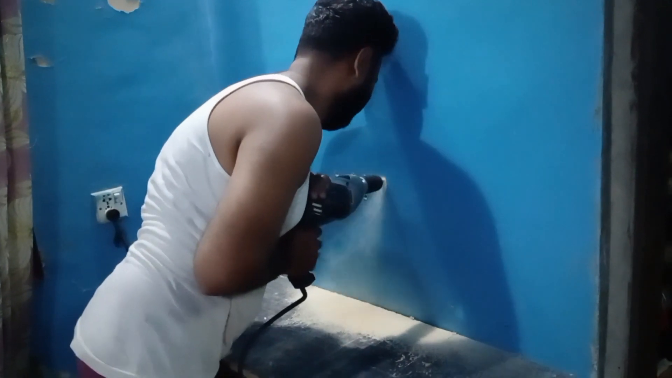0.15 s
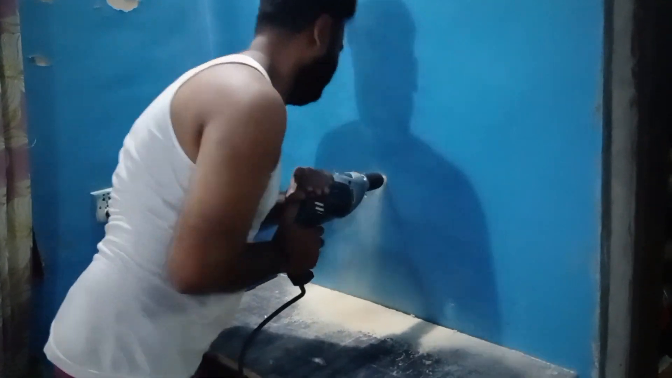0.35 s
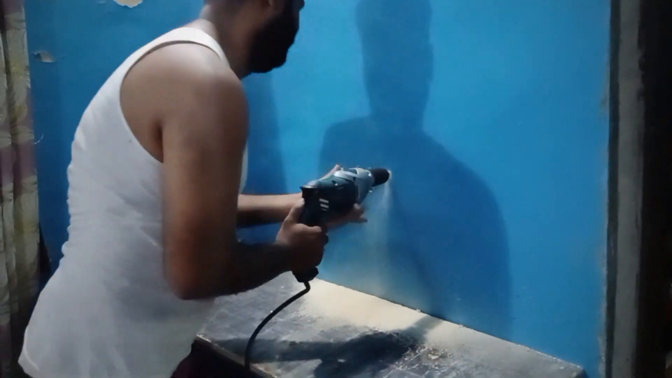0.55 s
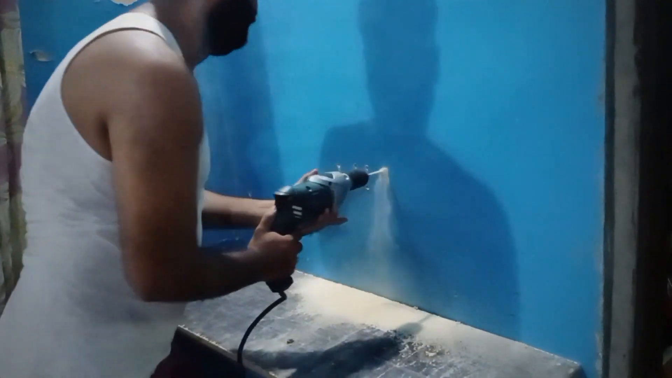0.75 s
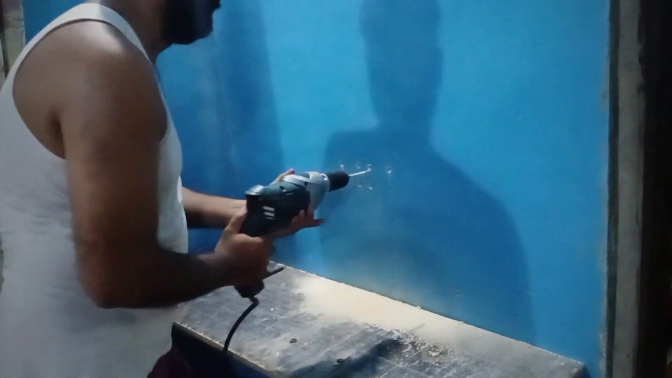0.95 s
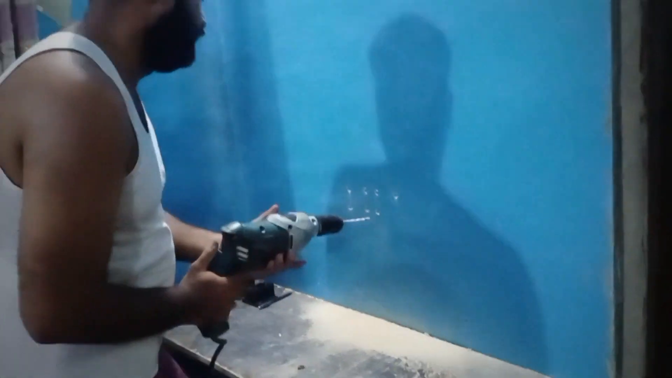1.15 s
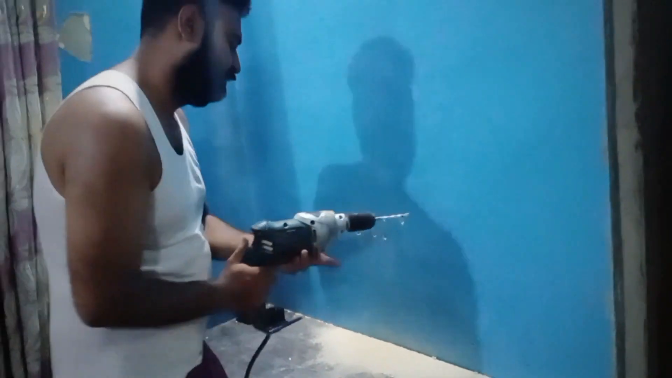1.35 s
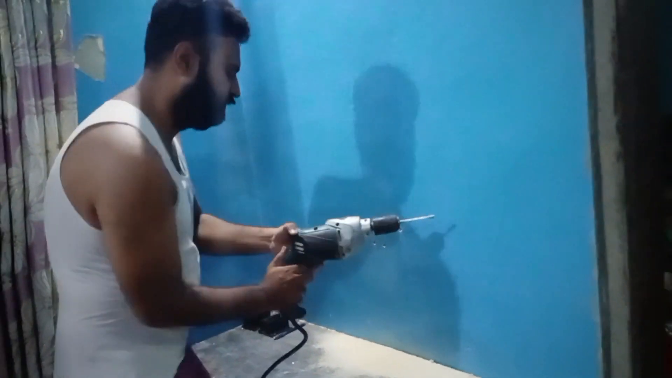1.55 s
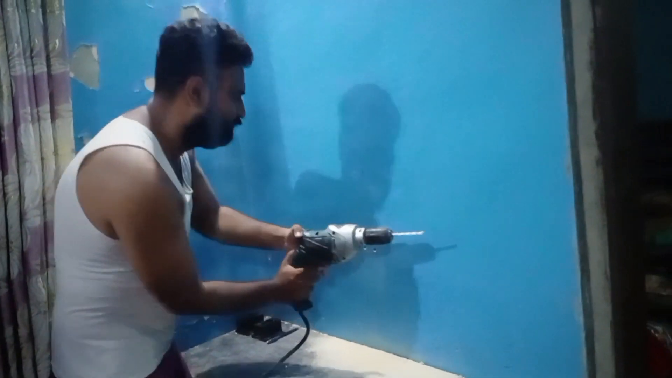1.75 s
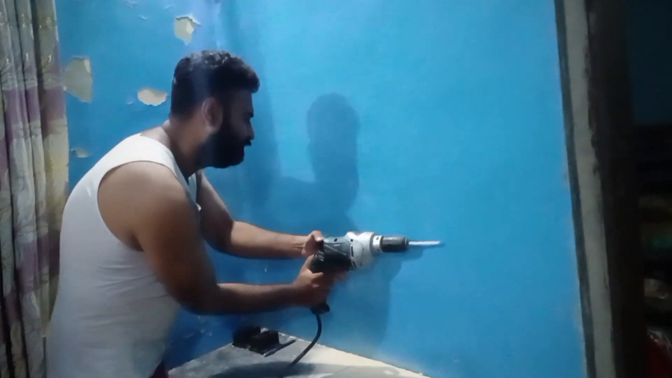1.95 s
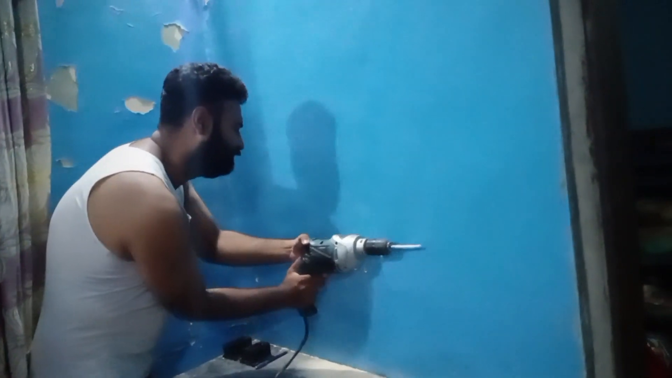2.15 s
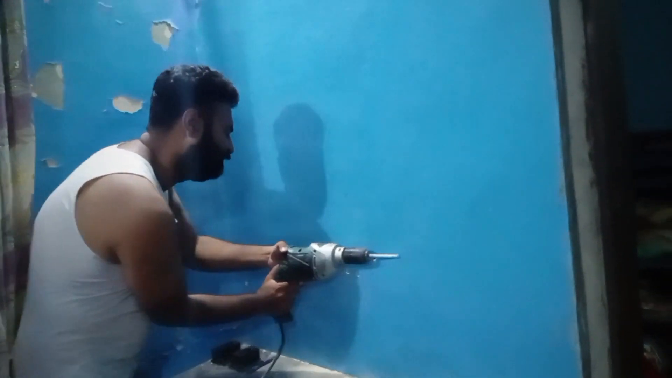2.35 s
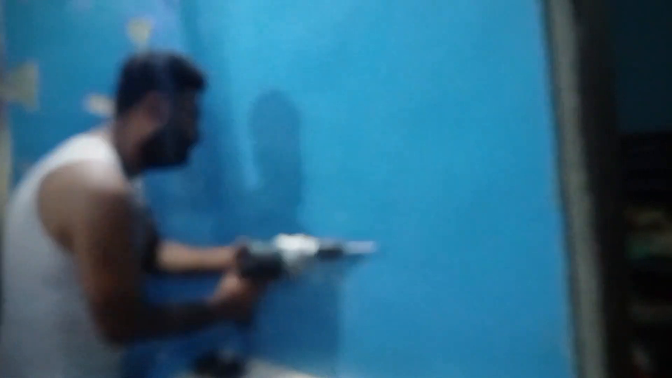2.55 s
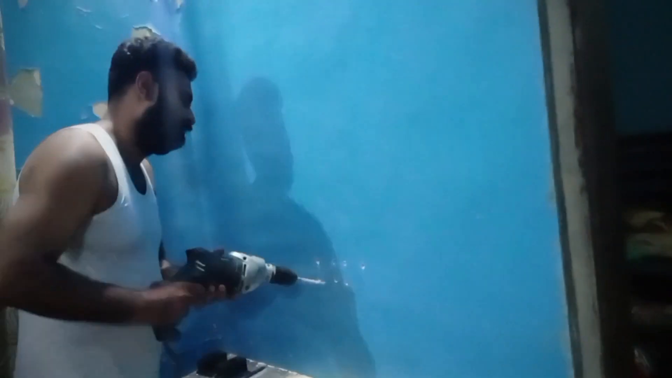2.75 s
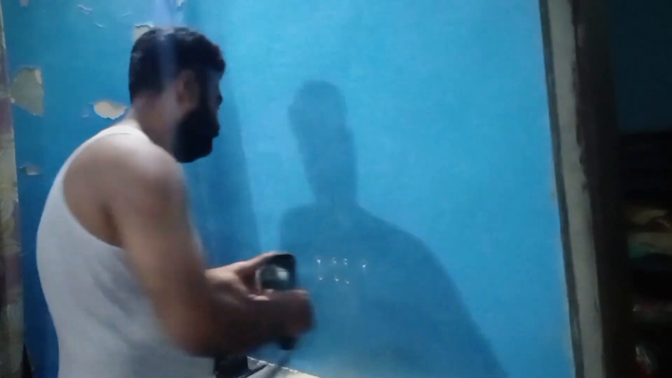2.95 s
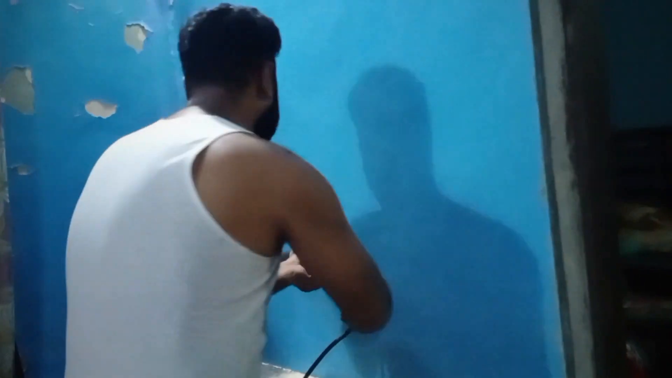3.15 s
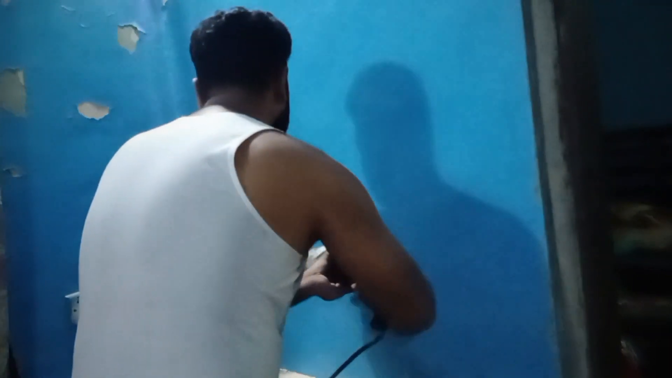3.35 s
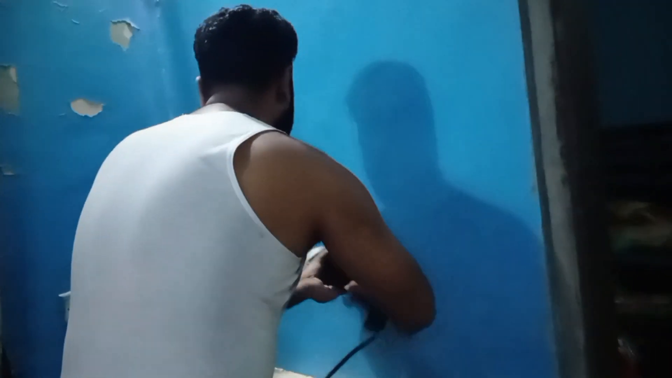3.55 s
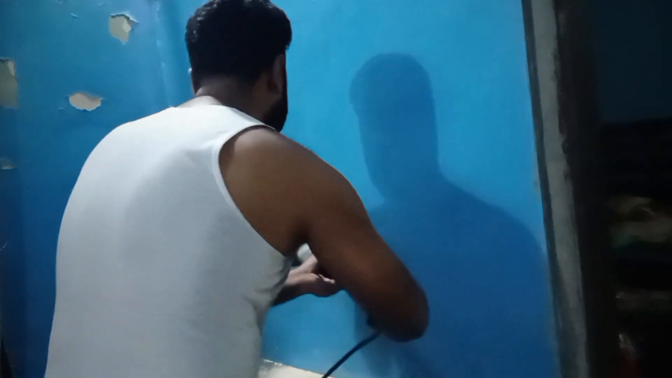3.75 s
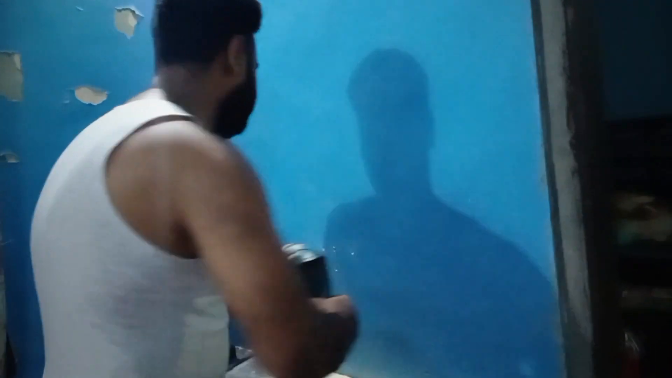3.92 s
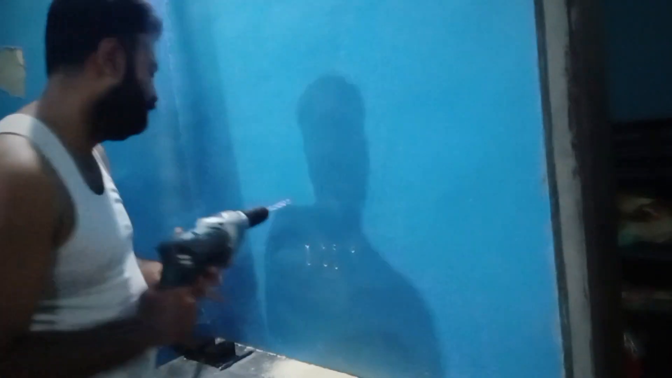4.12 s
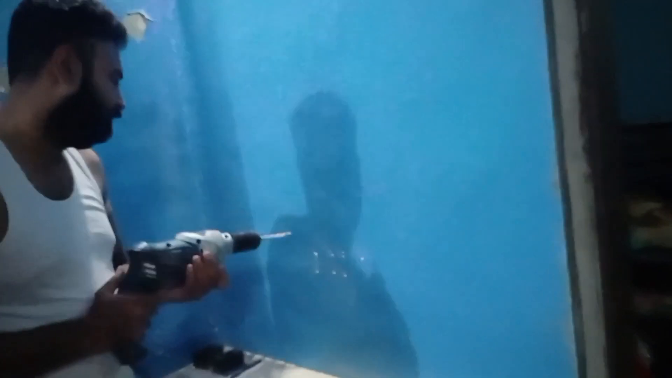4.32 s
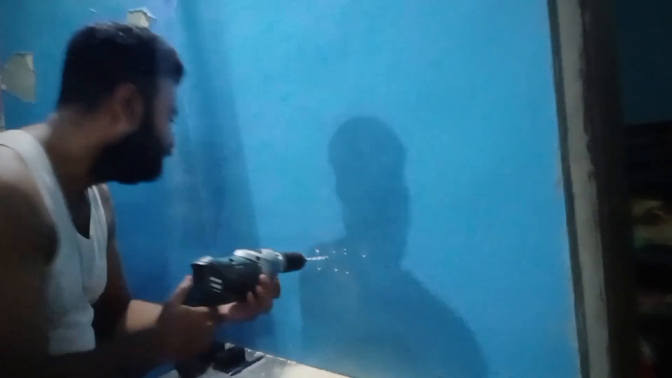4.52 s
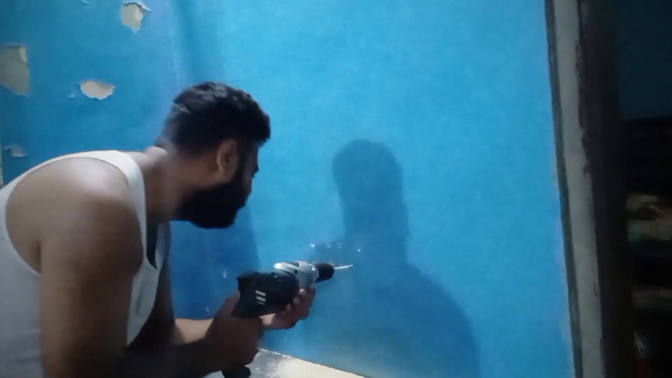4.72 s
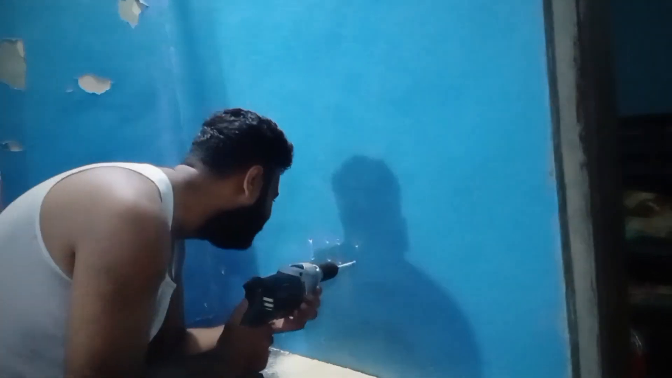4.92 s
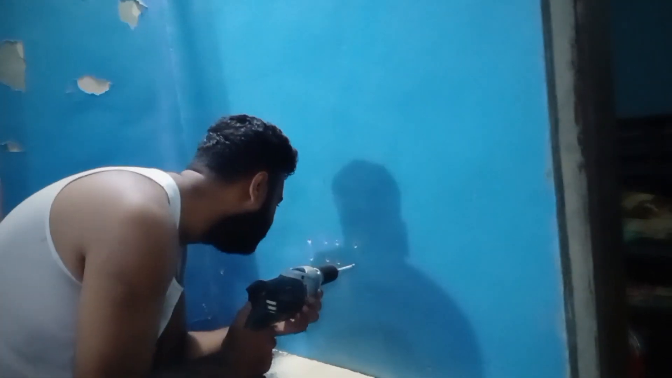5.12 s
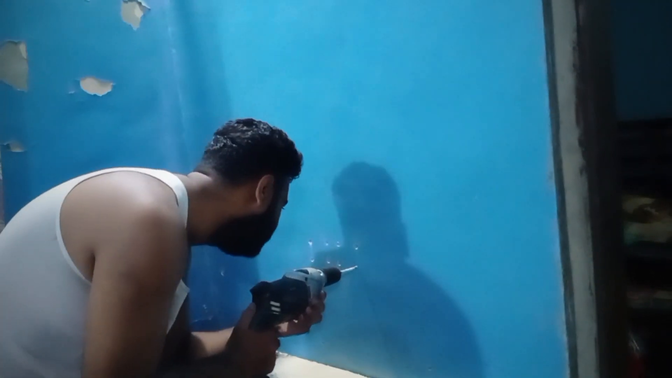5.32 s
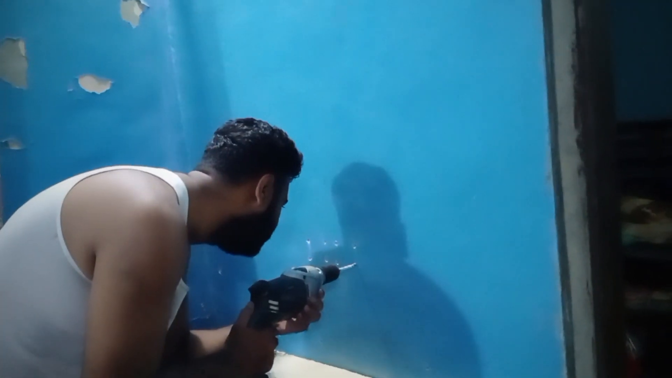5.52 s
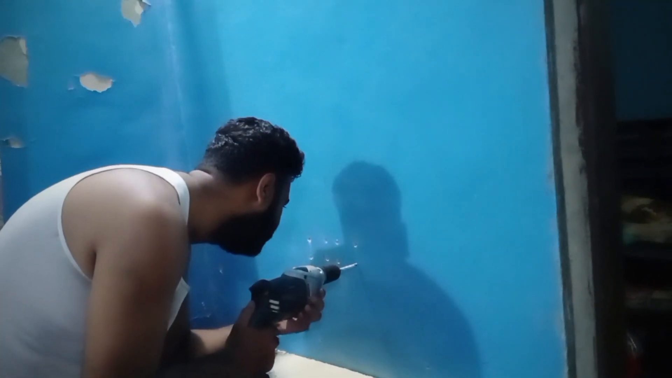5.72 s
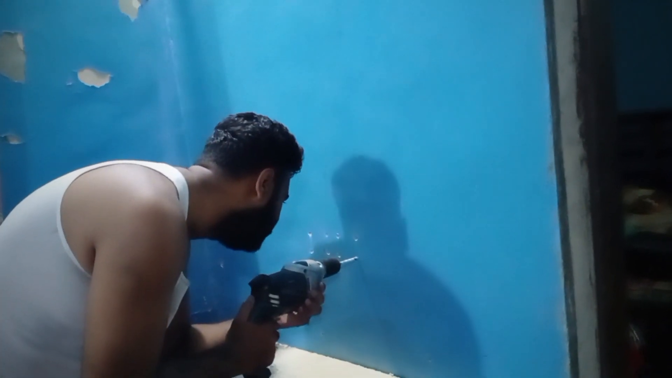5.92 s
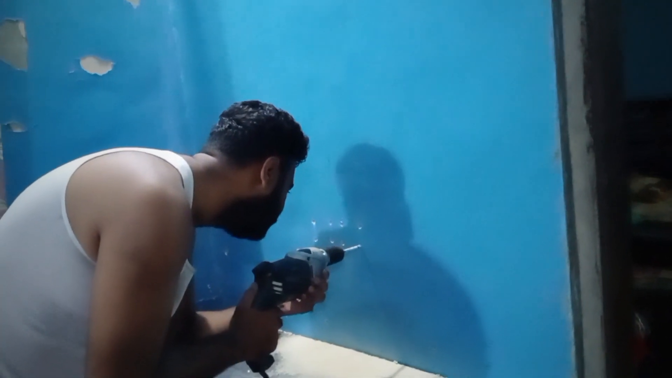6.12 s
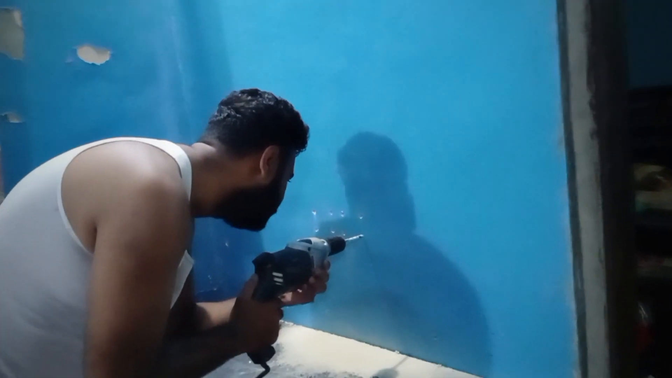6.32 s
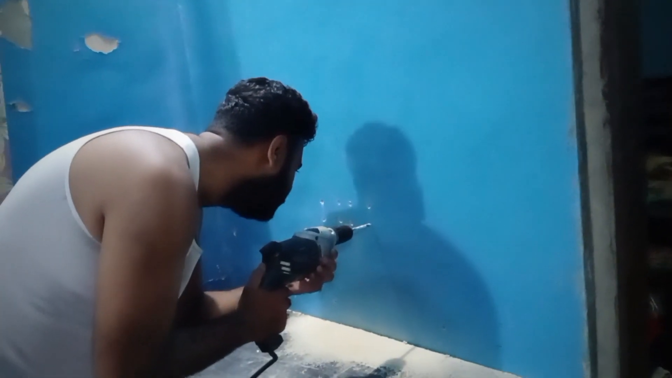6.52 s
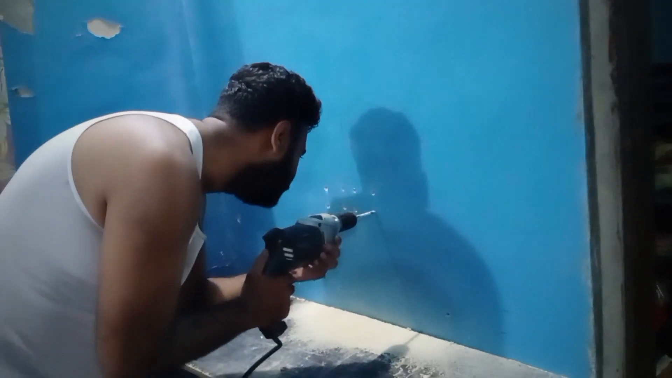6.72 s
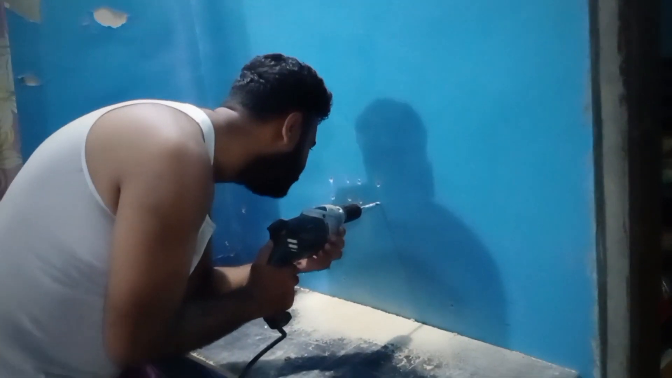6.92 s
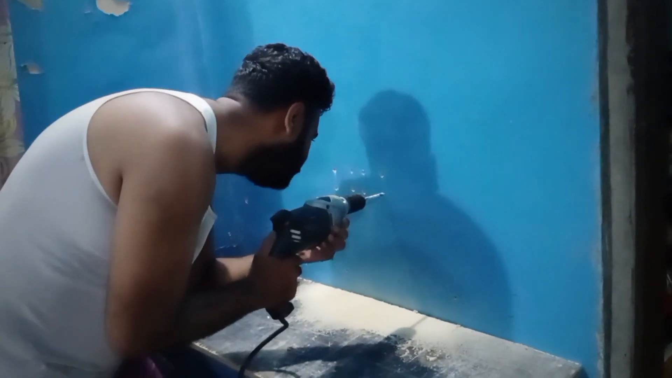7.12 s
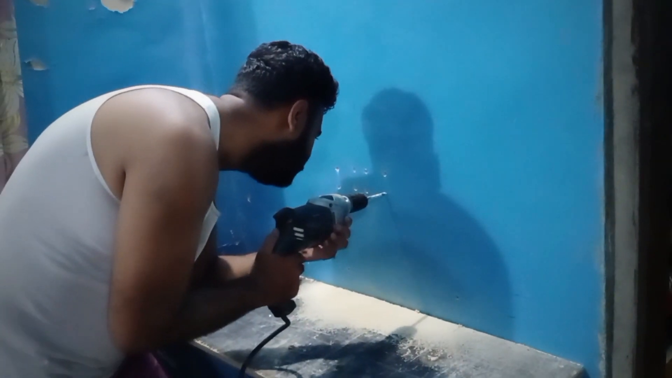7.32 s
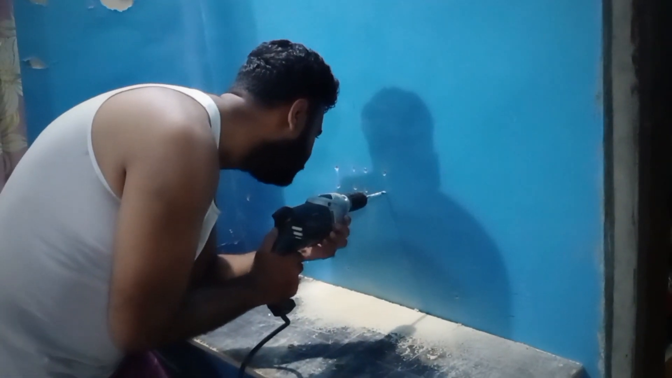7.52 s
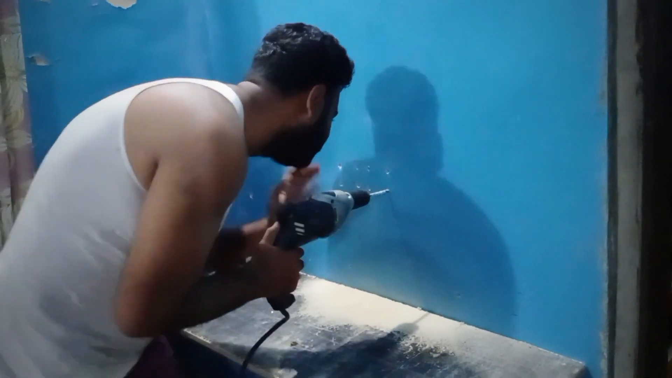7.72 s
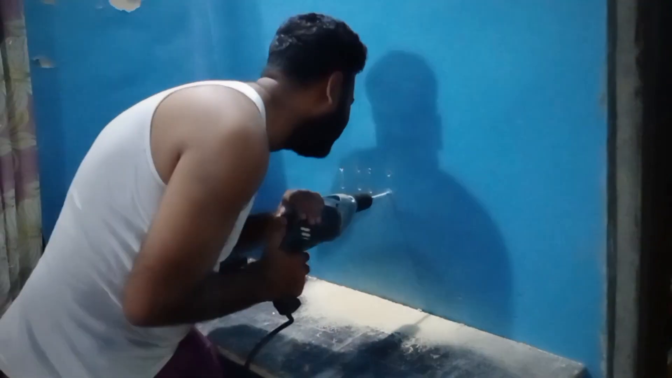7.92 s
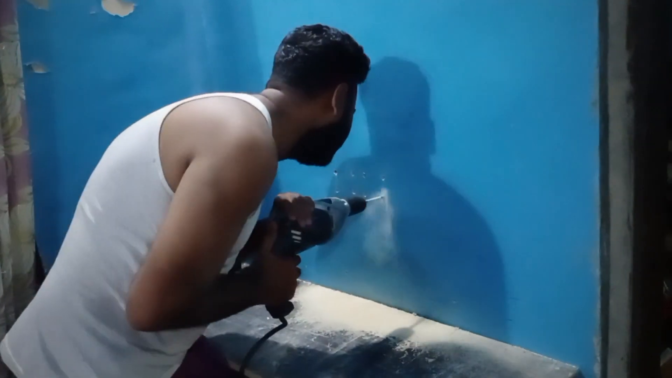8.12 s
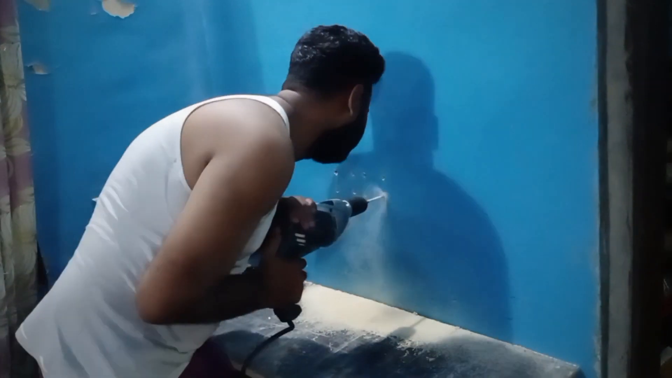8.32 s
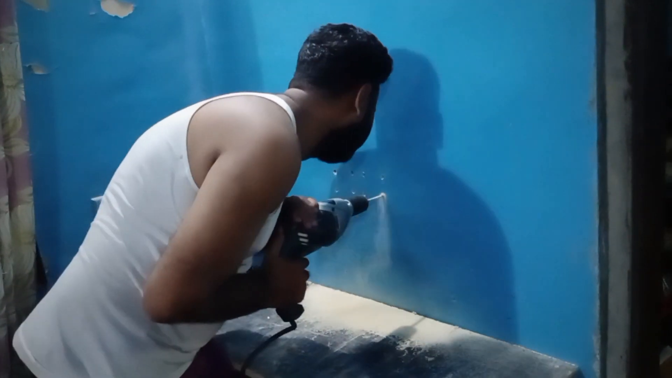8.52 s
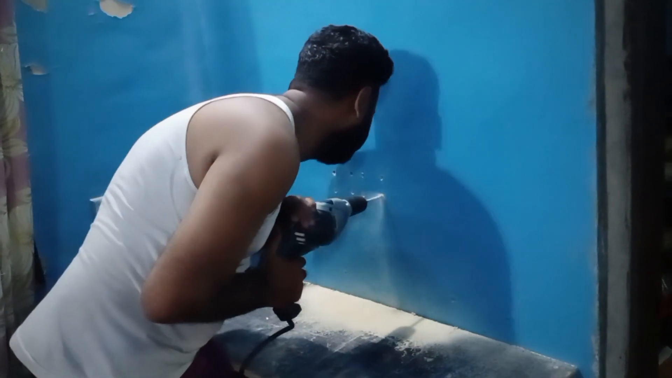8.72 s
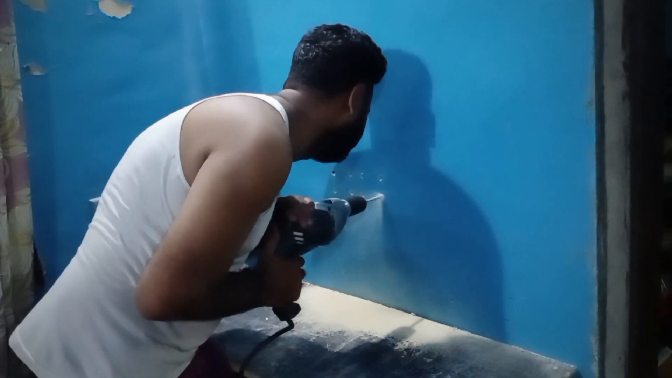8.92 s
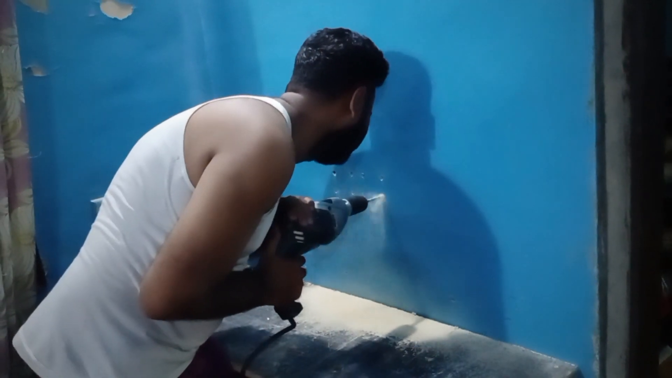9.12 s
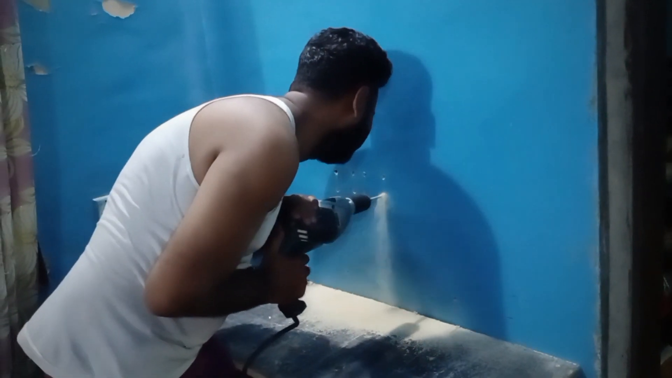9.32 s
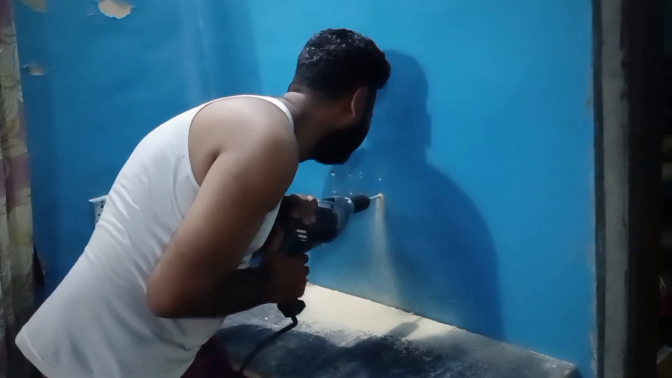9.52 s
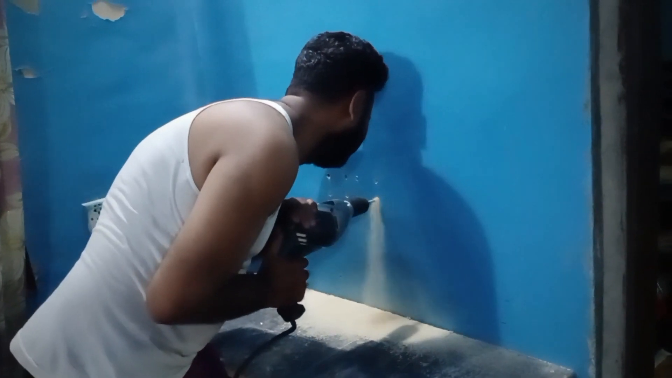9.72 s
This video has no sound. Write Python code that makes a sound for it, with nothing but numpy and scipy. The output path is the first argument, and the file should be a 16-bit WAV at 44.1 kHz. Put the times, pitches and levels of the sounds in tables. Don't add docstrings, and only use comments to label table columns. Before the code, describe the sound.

In a small hard room, close to the microphone, a hammer drill is already grinding loudly into plaster. It stops almost at once, its whine sliding down with light scrapes. It spins up again unloaded, whirring and roaring, then coasts down slowly to near quiet. A fan hisses and puffs at the microphone. Finally a few cracking blows lead into steady, harsh boring to the end.

```python
import sys
import numpy as np
from scipy import signal
from scipy.fft import rfft, irfft, next_fast_len
from scipy.io import wavfile
from scipy.ndimage import uniform_filter1d, map_coordinates

SR = 44100
rng = np.random.default_rng(int(sys.argv[2]) if len(sys.argv) > 2 else 0)


def decibels_to_gain(level_db):
    exponent = np.asarray(level_db, float) / 20
    return 10 ** exponent


def dump_mix(stems):
    frames = np.atleast_2d(stems).T
    limited = np.clip(frames, -1, 1)
    pcm = np.round(limited * 32767).astype(np.int16)
    wavfile.write(sys.argv[1], SR, pcm)


N = 434826

# (time [s], blow rate [Hz], tone level [dB], octave level [dB])
RATCHET_RUNS = [
    [(0, 924, -52, -31), (.16, 924, -48, -31), (.2, 922, -54, -42)],
    [(2.05, 574, -52, -57), (2.2, 655, -45, -44), (2.45, 715, -54, -46), (2.7, 670, -49, -52),
     (2.92, 580, -46, -51), (3, 540, -54, -51), (3.2, 690, -54, -48), (3.27, 710, -46, -46),
     (3.305, 715, -33, -44), (3.345, 722, -47, -46), (3.42, 738, -36, -46), (3.52, 755, -35, -46),
     (3.58, 760, -41, -46), (3.66, 780, -40, -44), (3.76, 796, -44, -46), (3.79, 786, -33, -44),
     (3.86, 756, -31, -46), (3.96, 685, -44, -48), (4.02, 655, -41, -48), (4.2, 585, -50, -50)],
    [(7.75, 530, -40, -48), (7.84, 735, -29, -35), (7.93, 822, -44, -31), (8, 890, -38, -26),
     (8.03, 925, -46, -46), (8.14, 1010, -36, -42), (8.3, 968, -41, -44), (8.46, 982, -34, -39),
     (8.58, 997, -34, -31), (8.68, 990, -34, -35), (8.76, 975, -38, -44), (8.95, 945, -35, -46),
     (9.08, 914, -46, -42), (9.13, 898, -36, -31), (9.2, 902, -38, -39), (9.27, 915, -50, -48),
     (9.38, 895, -35, -31), (9.55, 876, -36, -37), (9.86, 898, -37, -38)],
]
# (time [s], commutator whine then [Hz], standstill [s], level [dB])
COAST_DOWNS = [
    (.41, 10200, 1.84, -2.5),
    (4.335, 13000, 6.14, 0),
]


def unit(x):
    return x / np.sqrt(np.mean(x ** 2) + 1e-20)


def along(points, hz):
    f, v = np.transpose(points)
    return np.interp(np.log(hz + 1), np.log(f + 1), v)


def curves(rows):
    s, *cols = np.transpose(rows)
    t = np.arange(N) / SR
    opening = np.clip((t - s[0] + .004) / .004, 0, 1)
    closing = np.clip((s[-1] + .03 - t) / .03, 0, 1)
    return [np.interp(t, s, c) for c in cols], opening * closing


def ramp(s, length):
    return np.clip((np.arange(N) / SR - s) / length, 0, 1)


def wobble(rate):
    knots = rng.standard_normal(int(N * rate / SR) + 4)
    return map_coordinates(knots, [np.arange(N) * rate / SR])


def turns(hz):
    return 2 * np.pi * np.cumsum(hz) / SR


def coloured(x, spectrum, band=(20, 16000)):
    m = next_fast_len(N + 8192)
    hz = np.fft.rfftfreq(m, 1 / SR)
    z = rfft(x, m) * decibels_to_gain(along(spectrum, hz))
    inside = irfft(z * ((hz > band[0]) & (hz < band[1])), m)[:N]
    return irfft(z, m)[:N] / np.std(inside)


def lifted(x, modes):
    m = next_fast_len(N + 8192)
    f = np.fft.rfftfreq(m, 1 / SR)
    lift_db = sum(db / (1 + (2 * (f - hz) / width) ** 2) for hz, width, db in modes)
    return irfft(rfft(x, m) * decibels_to_gain(lift_db), m)[..., :N]


def highs(x, hz):
    return signal.sosfiltfilt(signal.butter(2, hz, "high", fs=SR, output="sos"), x)


def rush(patchy_db, high_db=0, low_db=0):
    hz, _, z = signal.stft(rng.standard_normal(N), SR, nperseg=512)
    field = uniform_filter1d(rng.standard_normal(z.shape), size=4, axis=0)
    field = uniform_filter1d(field, size=9, axis=1)
    depth = patchy_db + high_db * (hz > 7000)[:, None] + low_db * (hz < 2300)[:, None]
    return signal.istft(z * decibels_to_gain(depth * unit(field)), SR, nperseg=512)[1][:N]


def drill():
    # (frequency [Hz], width [Hz], lift [dB])
    casing = [(1415, 150, 4.5), (1670, 54, 2), (2030, 27, -1), (2084, 30, 1), (2370, 67, 2.5),
              (3100, 280, 1.5), (4720, 180, 0), (5520, 800, 1), (6150, 85, -0.5), (8320, 160, -0.5),
              (11120, 330, 2)]
    tone, beat = ratchet()
    grip = wobble(8.8)
    air_gain, roar_gain = motor()
    noise = grinding(beat, grip) + housing_roar(roar_gain, grip) + cooling_air(air_gain, beat, grip)
    return decibels_to_gain(-1.08) * lifted(noise, casing) + rotor() + rattles() + first_blows(), tone


def grinding(beat, grip):
    # (time [s], level [dB])
    pressure = [
        [(0.0, -19.5), (0.354, -20.5), (0.364, -22.5), (0.57, -22.5), (0.764, -34.5), (0.85, -42)],
        [(7.584, -29), (7.625, -23), (7.68, -19.5), (7.77, -18), (7.86, -19.5), (9.86, -19.5)],
    ]
    # (frequency [Hz], density [dB per Hz])
    plaster = [(88, -64), (150, -60), (352, -33), (396, -39), (490, -16.5), (812, -17), (860, -15.5),
               (966, -15), (1270, -16.5), (1800, -5), (2410, -5), (5030, 4.5), (7560, -6.5), (11100, -3.5),
               (15500, -16)]
    # (frequency [Hz], width [Hz], lift [dB])
    bit_modes = [(2500, 400, -3), (3250, 90, 3), (4100, 70, 2), (4600, 70, 4), (5200, 70, 5), (5560, 80, 4)]
    grind = coloured(lifted(rush(patchy_db=1.5) * (1 + beat), bit_modes), plaster, (3000, 7000))
    backed_off = ramp(.36, .01) * (1 - ramp(1, 1))
    grind = grind - .5 * highs(grind, 9000) * backed_off
    feeds = [decibels_to_gain(db) * gate for (db,), gate in map(curves, pressure)]
    return np.max(feeds, axis=0) * decibels_to_gain(0.037 * grip) * grind


def ratchet():
    # (multiple [1], level over the octave [dB])
    blow_orders = [(3, -6), (4, -7), (5, -9), (6, -12)]
    # (order [eighths of the blow rate], level over the mean tone [dB])
    uneven = [(2, -28), (3, -26), (4, -18), (5, -22), (6, -18), (7, -20), (9, -15), (10, -18), (11, -19),
              (13, -18), (15, -12), (17, -11)]
    # (multiple [1], level over the tone [dB])
    free_orders = [(4, -4), (5, -7), (7, -3)]
    tone, beat = np.zeros(N), np.zeros(N)
    for rows, boring in zip(RATCHET_RUNS, (1, 0, 1)):
        (hz, first_db, octave_db), gate = curves(rows)
        on = gate > 0
        unsteady = 1 + (.009 - .004 * boring) * wobble(22) + .002 * wobble(5)
        phase = turns(uniform_filter1d(hz, size=2200) * unsteady)[on]
        chance = wobble(12)

        def shake(k):
            return np.roll(chance, 7000 * int(k))[on]

        mean = uniform_filter1d(decibels_to_gain(first_db), size=12000)[on]
        first_db, octave_db = first_db[on], octave_db[on]
        lines = decibels_to_gain(first_db + 1.5 * shake(6)) * np.sin(phase)
        lines += decibels_to_gain(octave_db + 2.5 * shake(1)) * np.sin(2 * phase)
        for k, db in blow_orders:
            lines += decibels_to_gain(octave_db + db + 3 * shake(k)) * np.sin(k * phase)
        if boring:
            for k, db in uneven:
                lines += mean * decibels_to_gain(db + 5 * shake(k + 9)) * np.sin(k * phase / 8)
        else:
            for k, db in free_orders:
                lines += decibels_to_gain(first_db + db + 3 * shake(k + 30)) * np.sin(k * phase)
        tone[on] += np.sqrt(2) * gate[on] * lines
        beat[on] += gate[on] * 0.19 * np.cos(phase)
    return tone, beat


def first_blows():
    # (time [s], peak level [dB])
    early_blows = [(7.5814, -20), (7.5853, -7), (7.5914, -8), (7.5964, -15), (7.6044, -10), (7.6114, -12),
                   (7.6184, -17), (7.6254, -13), (7.6304, -8), (7.6344, -6), (7.643, -11), (7.6514, -9),
                   (7.6585, -12), (7.667, -17), (7.6714, -13), (7.6884, -9), (7.6934, -2)]
    bit_hz, bit_t60_s, crack_t60_s = 5450, 0.012, 0.0063
    out, t = np.zeros(N), np.arange(SR // 20) / SR
    for s, db in early_blows:
        hz = bit_hz * (1 + .04 * rng.standard_normal())
        ring = np.sin(2 * np.pi * hz * t) * decibels_to_gain(-60 * t / bit_t60_s)
        grit = rng.standard_normal(len(t) + 3)
        grit = grit[3:] - grit[:-3]
        crack = .5 * grit * decibels_to_gain(-60 * t / crack_t60_s)
        out[round(s * SR):][:len(t)] += decibels_to_gain(db - 3.0) * (ring + crack) * (1 - np.exp(-t / 0.00036))
    return out


def motor():
    # (on [s], off [s], spin-up [s], cooling air [dB], housing roar [dB], both at full speed)
    trigger = [
        (-.1, .35, .01, -25, -70),
        (1.801, 4.328, 0.13, -23.5, -21),
        (7.606, 9.9, 0.017, -23, -70),
    ]
    # (time [s], lift [dB])
    scrapes = [
        (1.14, 5),
        (1.4, 6.9),
        (1.61, 5.4),
    ]
    full_blows_hz, coast_hz, scrape_s = 1022, 9600, 0.097
    air, roar = np.zeros(N), np.zeros(N)
    eased = ramp(4.06, 0.16) * (1 - ramp(COAST_DOWNS[1][0], .1))
    for (on, off, rise, air_db, roar_db), rows in zip(trigger, RATCHET_RUNS):
        speed = curves(rows)[0][0] / full_blows_hz
        held = ramp(on, rise) * (1 - ramp(off, 0.026))
        slow_start = .55 + .45 * ramp(on + rise, .25)
        run_air = held * (1 + 0.34 * eased) * decibels_to_gain(air_db) * speed ** 0.84
        run_roar = held ** 6 * slow_start * (1 - 0.35 * eased) * decibels_to_gain(roar_db) * speed ** 0.84
        air, roar = np.maximum(air, run_air), np.maximum(roar, run_roar)
    chatter = decibels_to_gain(-50.5 + 4 * wobble(14))
    for s, whine_hz, stop, db in COAST_DOWNS:
        hz, gate = coast(s, whine_hz, stop)
        coast_air = decibels_to_gain(-29 + db + 1.5 * wobble(16)) * (hz / coast_hz) ** 0.71
        geared = decibels_to_gain(-31.5 + db) * np.minimum(hz / coast_hz, 1.1) ** 3.15
        air = np.maximum(air, gate * coast_air)
        roar = np.maximum(roar, gate * np.hypot(geared, chatter))
    t = np.arange(N) / SR
    graze_db = sum(db * np.exp(-((t - s) / scrape_s) ** 2) for s, db in scrapes)
    return air * decibels_to_gain(graze_db), roar


def coast(s, whine_hz, stop):
    drag_hz, drag_per_s, fade_in_s, fade_out_s = 15880, .365, .25, 0.18
    t = np.clip(np.arange(N) / SR - s, 0, stop - s)
    hz = drag_hz * np.tan(np.arctan(whine_hz / drag_hz) - drag_per_s * t)
    gate = ramp(s - fade_in_s, fade_in_s) * (1 - ramp(stop - fade_out_s, fade_out_s)) ** 2
    return np.maximum(hz, 300), gate


def housing_roar(gain, grip):
    # (frequency [Hz], density [dB per Hz])
    housing = [(180, -70), (300, -52), (344, -78), (499, -31), (656, -18.5), (743, -12.5), (841, -18),
               (1090, -16.5), (1810, 2), (2590, -5.5), (2860, -6.5), (3560, -9), (5230, -6), (8000, -18.5),
               (10400, -15.5), (17600, -120)]
    roar = coloured(rush(patchy_db=2.3) * decibels_to_gain(0.99 * wobble(90)), housing, (1200, 2400))
    return gain * decibels_to_gain(0.49 * grip - 0.56) * roar


def cooling_air(gain, beat, grip):
    # (frequency [Hz], density [dB per Hz])
    vents = [(1470, -37), (2500, -26), (2560, -65), (3170, -14), (4170, -14), (5320, -6), (6200, -8.5),
             (7010, -6.5), (9950, -10.5), (11200, -10.5), (12900, -13.5), (13700, -16), (15500, -25.5)]
    air = coloured(rush(patchy_db=2.0) * (1 + beat) * decibels_to_gain(1.4 * wobble(300)), vents, (8000, 15000))
    slowness = np.clip(1 - gain / decibels_to_gain(-29), 0, 1)
    air = air - .75 * highs(air, 10000) * slowness
    return gain * decibels_to_gain(0.075 * wobble(27) + 0.088 * grip - 1.57) * air


def rotor():
    # (time [s], frequency [Hz], level [dB])
    pick_up = [(1.895, 4150, -33), (1.925, 4900, -28), (1.965, 6200, -33), (2.04, 5800, -33),
               (2.085, 7000, -33), (2.13, 7700, -37), (2.22, 8450, -36), (2.4, 8750, -36), (2.6, 8900, -38),
               (2.8, 8300, -41), (3, 7600, -48)]
    # (whine frequency [Hz], level [dB])
    whine_levels = [(1500, -70), (4300, -55), (5500, -40), (7500, -38), (8300, -39), (9300, -40),
                    (10500, -41), (12300, -40), (13000, -36)]
    # (whine frequency [Hz], level [dB])
    mesh_levels = [(1500, -63), (2500, -54), (4000, -43), (7500, -38), (10500, -38.5), (13000, -44)]
    # (frequency [Hz], level [dB])
    mesh_tilt = [(3000, -30), (4500, -13), (6800, -5), (9500, -11), (12000, -7), (13500, -12), (15500, -20),
                 (16500, -120)]
    # (frequency [Hz], width [Hz], lift [dB])
    grille = [(7000, 700, 4), (8600, 400, 1), (11500, 500, 2), (12900, 600, 2)]
    mesh_ratio = 7 / 48
    out = np.zeros(N)
    (hz, whine_db), gate = curves(pick_up)
    spans = [(uniform_filter1d(hz, size=1200), gate, whine_db, whine_db - 40, .016)]
    for (s, whine_hz, stop, db), dim_db in zip(COAST_DOWNS, (1, 2.5)):
        hz, gate = coast(s, whine_hz, stop)
        whine_db = along(whine_levels, hz) + db
        mesh_db = along(mesh_levels, hz) + db + dim_db
        spans.append((hz, gate * ramp(s - .04, .04), whine_db, mesh_db, .009))
    for hz, gate, whine_db, mesh_db, jitter in spans:
        on = gate > 0
        phase = turns(hz * (1 + jitter * wobble(220)))[on]
        flutter = wobble(24)
        whine = np.sin(phase) + .2 * np.sin(phase / 2)
        whine += .07 * np.sin(2 * phase) * (hz[on] < 7700)
        part = decibels_to_gain(whine_db[on] + 1 + 2.5 * flutter[on]) * whine
        for k in range(8, 30):
            tilt_db = along(mesh_tilt, k * mesh_ratio * hz[on])
            shimmer_db = 2.5 * np.roll(flutter, 9000 * k)[on]
            part += decibels_to_gain(mesh_db[on] + shimmer_db + tilt_db) * np.sin(k * mesh_ratio * phase + k * k)
        out[on] += np.sqrt(2) * gate[on] * part
    return lifted(out, grille)


def rattles():
    # (time [s], length [s], frequency [Hz],
    # level [dB])
    rings = [(0, .24, 4590, -23), (0, .2, 2780, -35), (7.63, .13, 495, -35), (7.66, .1, 1180, -40),
             (7.64, .1, 620, -42), (7.635, .12, 740, -38), (4.42, .12, 5600, -35), (4.5, .12, 5420, -34),
             (4.58, .12, 5230, -34), (4.66, .1, 5050, -33), (5.07, .05, 7000, -33), (2, .6, 2130, -32),
             (2, .3, 1400, -35), (2.2, .35, 1750, -39), (2.47, .08, 5550, -29), (2.55, .38, 1660, -31),
             (3.1, .7, 1850, -27), (3.15, .3, 2150, -29), (3.42, .25, 2920, -32), (3.55, .5, 2050, -30),
             (3.75, .3, 1930, -31), (3.7, .08, 5600, -30), (3.95, .22, 1720, -30), (2.3, .4, 1500, -36),
             (2.9, .4, 1380, -35), (3.8, .2, 2400, -33), (.42, .2, 1650, -36), (.15, .2, 720, -42),
             (.28, .12, 500, -42), (8.3, .6, 495, -47), (8.35, .4, 735, -48), (8.85, .2, 1085, -44),
             (8.38, .2, 3980, -34), (9.4, .3, 3600, -35), (4.55, .2, 1690, -32), (4.45, .15, 1800, -35)]
    # (time [s], length [s], frequency [Hz], level [dB])
    jolts = [(0.273, 0.24, 505, -43.5), (0.381, 0.084, 800, -38), (1.814, 0.06, 5670, -30),
             (1.867, 0.038, 5000, -23), (1.895, 0.047, 4630, -19), (4.146, 0.37, 1170, -35.5),
             (0.449, 0.59, 1390, -38.5), (3.999, .25, 940, -43), (1.999, 0.24, 2500, -28),
             (3.099, 0.24, 1620, -31.5), (4.294, 0.39, 5600, -33), (5.584, 0.2, 1710, -39.5),
             (7.626, .09, 320, -38.5)]
    out = np.zeros(N)
    rows = [(*row, 36) for row in rings]
    rows += [(*row, .25 * row[2]) for row in jolts]
    for s, length, hz, db, width_hz in rows:
        band = signal.butter(1, [hz - width_hz / 2, hz + width_hz / 2], "band", fs=SR, output="sos")
        n = round(length * SR)
        noise = signal.sosfilt(np.vstack([band, band]), rng.standard_normal(SR))
        burst = unit(noise[4000:])[:n]
        out[round(max(s, 0) * SR):][:n] += decibels_to_gain(db) * burst * np.hanning(n) ** .4
    return out


def room(x):
    # (frequency [Hz], t60 [s])
    walls = [(200, 0.49), (2000, 0.41), (10000, 1)]
    hz, t, z = signal.stft(rng.standard_normal(SR // 2), SR, nperseg=256)
    tail = signal.istft(z * decibels_to_gain(-60 * t / along(walls, hz)[:, None]), SR, nperseg=256)[1]
    delayed = np.pad(x, (300, 0))
    return signal.fftconvolve(delayed, tail / np.linalg.norm(tail))[:N]


def fan():
    # (frequency [Hz], density [dB per Hz])
    hiss_spectrum = [(1090, -40), (1700, -27), (1950, 2.5), (2130, 6), (2310, 1.5), (2500, 3.5),
                     (2790, 2.5), (3020, 1), (3670, 1.5), (4380, 3), (4670, 2), (6260, -2.5), (8170, -19.5),
                     (11200, -17), (12200, -31), (13000, -23), (13800, -38), (15500, -42)]
    # (frequency [Hz], width [Hz], lift [dB])
    hiss_dips = [(8050, 300, -5), (10300, 350, -9), (12300, 350, -8), (13300, 500, 5), (15300, 500, 4)]
    # (frequency [Hz], density [dB per Hz])
    hum_spectrum = [(160, -32), (280, -8), (617, -1), (945, -12), (1230, -5), (1460, -5.5), (1550, -1.5),
                    (1850, -8.5), (2400, -39), (4070, -120)]
    # (frequency [Hz], density [dB per Hz])
    buffet = [(15, -62), (25, -32), (59, -27), (119, -2), (171, -2), (306, 2), (450, -9), (580, -33),
              (990, -120)]
    hiss = lifted(rush(patchy_db=1.9, high_db=2.5, low_db=1.5), hiss_dips)
    out = decibels_to_gain(-36.5 + 0.11 * wobble(14)) * coloured(hiss, hiss_spectrum)
    out += decibels_to_gain(-49) * coloured(rush(patchy_db=5.5), hum_spectrum)
    out += draught() * decibels_to_gain(-6.0) * coloured(rush(patchy_db=2.0), buffet, (50, 330))
    return out + puffs()


def draught():
    # (time [s], peak level [dB])
    gusts = [(.63, -35), (.95, -40), (1.07, -40), (1.37, -46), (1.53, -49), (1.59, -46), (1.665, -38),
             (1.71, -46), (1.835, -35.5), (1.95, -32), (2.0, -34), (2.59, -36), (2.67, -43), (2.74, -34),
             (3.2, -45), (3.71, -44), (4.12, -44), (4.26, -46), (4.31, -52), (4.45, -49), (4.57, -44),
             (4.71, -46), (4.78, -43), (4.87, -43), (4.91, -44), (4.96, -45), (5.41, -49), (5.6, -49),
             (5.66, -42), (5.81, -50), (5.89, -45), (6.12, -49), (6.24, -44), (6.4, -36), (6.55, -46),
             (6.76, -42), (6.81, -51), (7.1, -48), (7.43, -37), (7.64, -40), (8.27, -40), (8.81, -43),
             (9.01, -38), (9.2, -41), (9.4, -42), (9.67, -52)]
    calm_db, rise_db_per_s, fall_db_per_s = -60.0, 420, 420
    t, db = np.arange(N) / SR, np.full(N, calm_db)
    for s, peak_db in gusts:
        db = np.maximum(db, peak_db - np.maximum(rise_db_per_s * (s - t), fall_db_per_s * (t - s)))
    return decibels_to_gain(db)


def puffs():
    # (time [s], peak level [dB], frequency [Hz])
    eddies = [(0.198, -39, 738), (0.546, -34.5, 734), (0.692, -34.5, 625), (1.264, -46, 300),
              (1.369, -32.5, 350), (1.539, -40, 575), (1.897, -37, 654), (1.999, -31.5, 753),
              (2.106, -36, 635), (2.572, -42, 262), (2.733, -32.5, 261), (2.91, -37, 646), (2.98, -33, 556),
              (3.057, -25.5, 560), (3.141, -48, 725), (3.284, -42, 770), (3.639, -40, 774),
              (3.771, -32, 775), (3.989, -31, 703), (4.111, -47, 605), (4.273, -36, 564), (4.817, -38, 714),
              (4.904, -36.5, 635), (4.965, -35, 620), (5.316, -38.5, 646), (5.587, -33, 628),
              (3.53, -37.5, 520), (5.28, -38, 635), (5.75, -43, 820), (5.85, -42, 554), (4.5, -46, 600),
              (1.05, -51, 900), (6.407, -40, 275), (6.691, -45, 620), (6.981, -48, 635), (7.504, -44, 570)]
    out, t = np.zeros(N), np.arange(SR // 4) / SR
    for s, db, hz in eddies:
        sway = np.cumsum(rng.standard_normal(len(t))) * 0.07
        envelope = decibels_to_gain(db + 4.0 - 60 * t / 0.091) * (1 - np.exp(-t / 0.0038))
        out[round(s * SR):][:len(t)] += envelope * np.sin(2 * np.pi * hz * t + sway)
    return out


def scene():
    tool, tone = drill()
    direct = decibels_to_gain(-0.5) * (tool + tone)
    reverberant = decibels_to_gain(-6.5) * room(tool + .55 * tone)
    mono = direct + reverberant + fan()
    return np.array([mono, mono])


def roll_off(x):
    return signal.sosfilt(signal.butter(12, 15530, fs=SR, output="sos"), x)


def record(dry):
    # (frequency [Hz], width [Hz], lift [dB])
    port = [(6650, 250, 1), (8250, 290, 1.5), (9980, 760, -2.5), (13400, 350, -5.5), (13600, 500, -4)]
    # (time [s], from [Hz], to [Hz])
    splits = [(.44, 5200, 6500), (1.09, 6300, 7700), (1.09, 9000, 10500), (1.765, 6900, 8400),
              (2.09, 7600, 9100), (3.04, 8300, 9800), (3.04, 12400, 14000), (5.64, 13200, 15300),
              (7.755, 11000, 13300), (7.825, 5700, 7000), (7.825, 8300, 9800), (8.127, 6300, 8400),
              (8.173, 7600, 9100), (8.73, 13200, 14700), (9.195, 6900, 9100), (9.404, 13900, 15300),
              (9.729, 4200, 5300), (9.729, 9000, 10500), (9.729, 12400, 14000)]
    dry = lifted(dry, port)
    dry = dry / (1 + abs(dry / .62) ** 4) ** (1 / 4)
    hz, t, z = signal.stft(dry[0], SR, nperseg=2048)
    side = np.zeros_like(z)
    for s, lo, hi in splits:
        band = (hz > lo) & (hz < hi)
        moment = np.argmin(abs(t - s))
        random_phase = np.exp(2j * np.pi * rng.random(band.sum()))
        side[band, moment] = 0.91 * z[band, moment] * random_phase
    split = signal.istft(side, SR, nperseg=2048)[1][:N]
    return roll_off(dry + [split, -split])


dry = scene()
out = record(dry)
dump_mix(out)
```